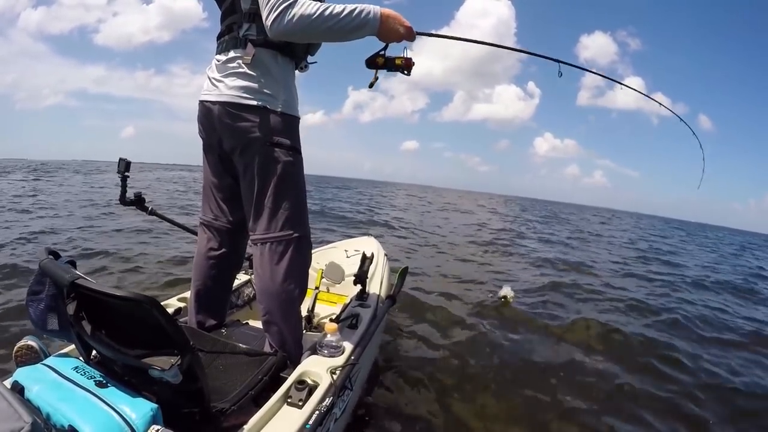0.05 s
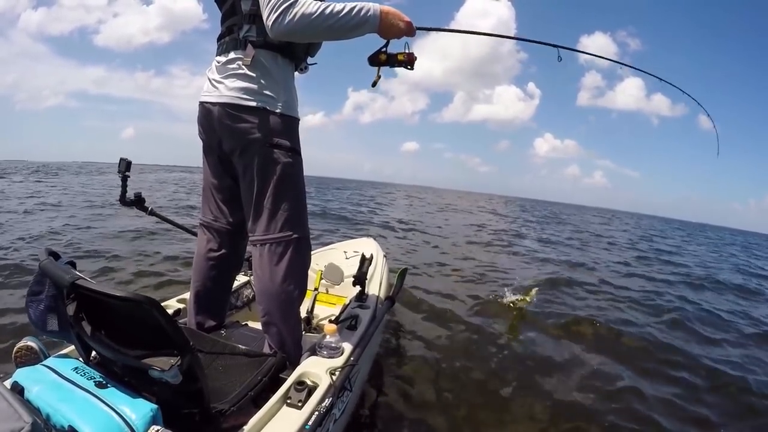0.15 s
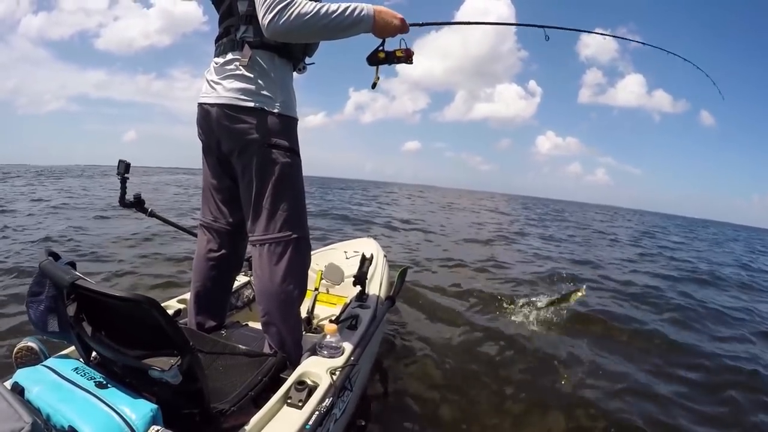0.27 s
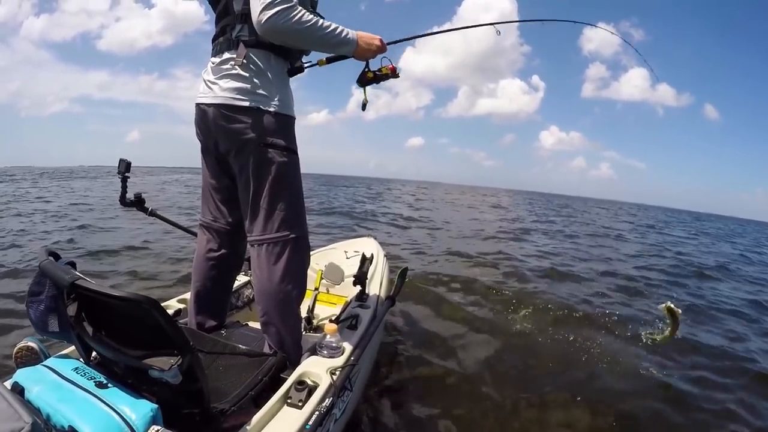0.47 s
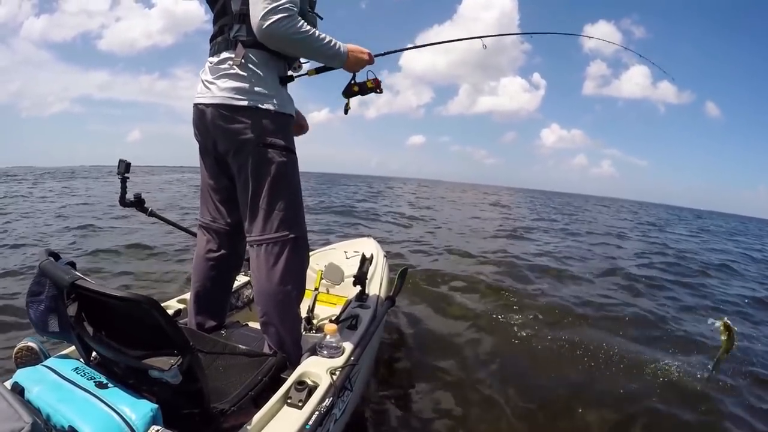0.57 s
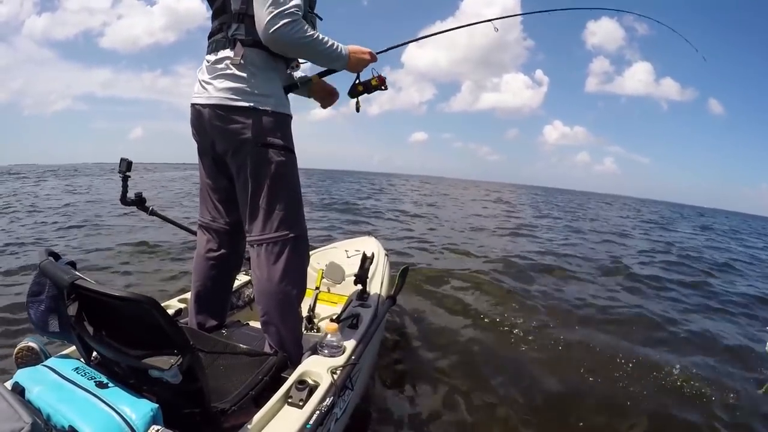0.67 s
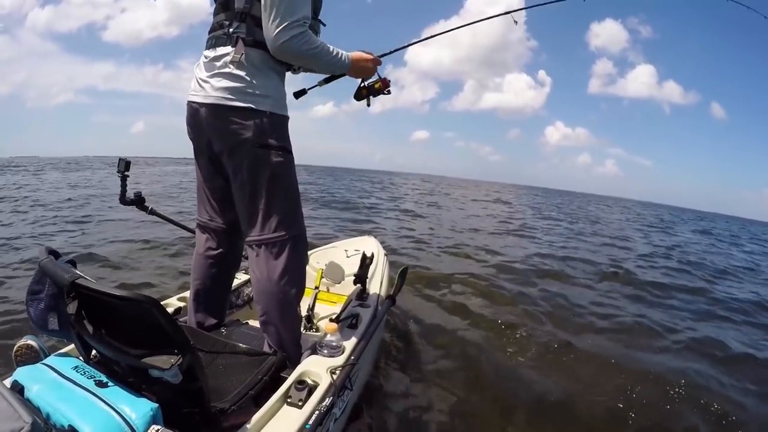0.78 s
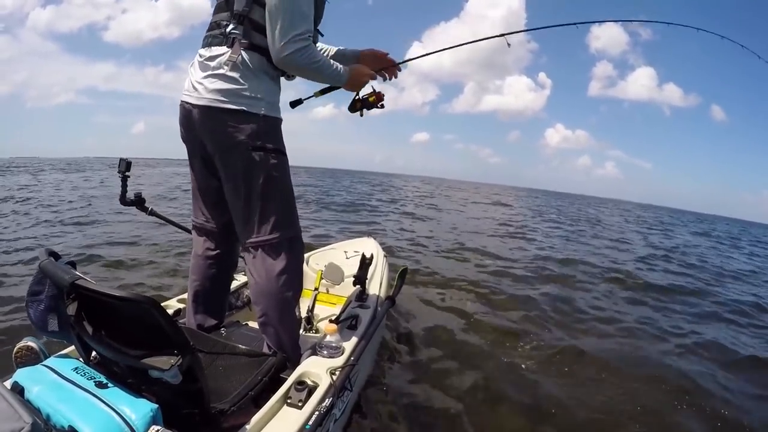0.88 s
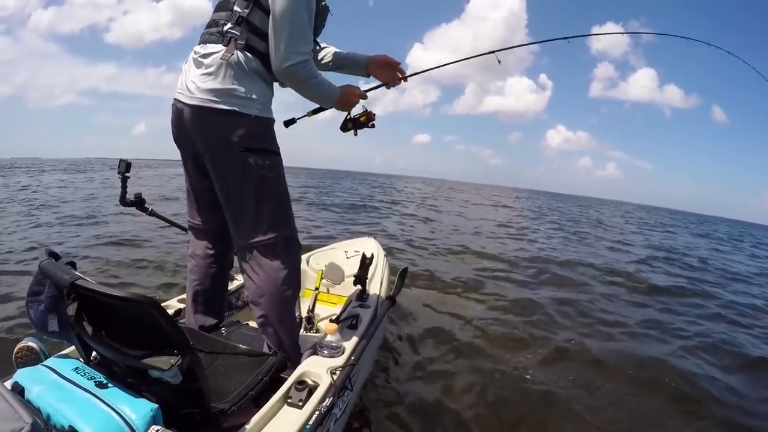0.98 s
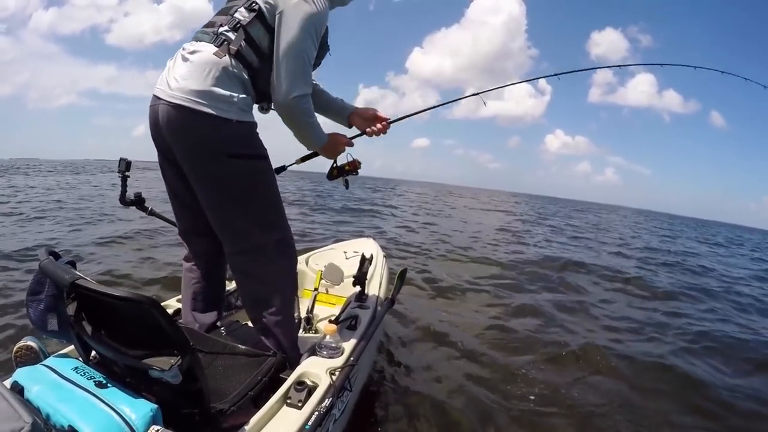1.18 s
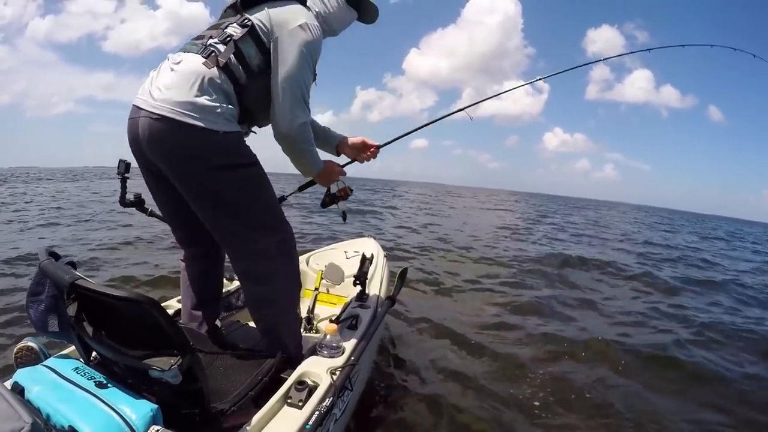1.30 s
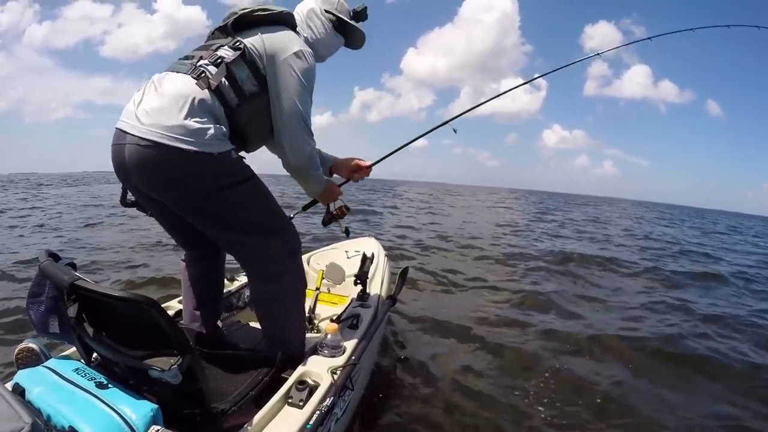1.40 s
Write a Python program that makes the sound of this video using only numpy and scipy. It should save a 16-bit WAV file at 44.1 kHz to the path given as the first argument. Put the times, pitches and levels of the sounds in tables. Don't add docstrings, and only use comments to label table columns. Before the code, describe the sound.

Water slaps a hollow plastic kayak hull, one hard knock, then a second weaker, amid droplets

```python
import sys
import numpy as np
from scipy import signal
from scipy.fft import rfft, irfft
from scipy.io import wavfile
from scipy.ndimage import uniform_filter1d

SR = 44100
rng = np.random.default_rng(int(sys.argv[2]) if len(sys.argv) > 2 else 0)


def field_ratio(decibels):
    return 10 ** (np.asarray(decibels, dtype=float) / 20)


def to_wav(sig):
    pcm = np.clip(np.atleast_2d(sig), -1, 1) * 32767
    pcm = np.round(pcm).astype(np.int16)
    wavfile.write(sys.argv[1], SR, pcm.T)


N = 63945


def unit(x):
    return x / np.sqrt(np.mean(x ** 2) + 1e-20)


def along(points, hz):
    f, level = np.transpose(points)
    return np.interp(np.log(hz + 1), np.log(f + 1), level, left=-120, right=-120)


def bump(hz, focus_hz, width_oct):
    octaves = np.log2((hz + 1) / focus_hz)
    return -6 * (octaves / max(width_oct, 0.05)) ** 2


def noise(gain, size):
    spectrum = rfft(rng.standard_normal(size))
    return unit(irfft(spectrum * gain(np.fft.rfftfreq(size, 1 / SR)), size))


def rings(s, db, hz, t60, rise, turn, size, glide=0):
    t = np.arange(size) / SR
    columns = (s, db, hz, t60, rise, turn)
    s, db, hz, t60, rise, turn = [np.broadcast_to(v, np.shape(s))[:, None] for v in columns]
    envelope = field_ratio(db - 60 * t / t60) * (1 - np.exp(-t / rise)) ** 2
    cycles = hz * t * (1 + glide * t / t60) + turn
    wave = envelope * np.sin(2 * np.pi * cycles)
    at = np.round(np.abs(s) * SR).astype(int) + np.arange(size)
    return np.bincount(at.ravel(), wave.ravel(), N + 2 * SR)[:N]


# (time [s], level [dB], focus [Hz], focus width [octaves], ring length [factor])
SLAPS = [(.026, -39, 1250, 0.36, 0.58), (.036, -38.5, 580, 0.071, 0.67), (.09, -35.5, 1150, 0.38, 0.54),
         (.101, -40.5, 930, 0.58, 0.62), (.136, -41.5, 1510, 0.34, 0.49), (.2145, -22.5, 1250, 0.5, 1.34),
         (.226, -19.5, 926, 0.29, 1.1), (.237, -21, 726, 0.7, 0.39), (.29, -42, 883, 0.32, 2.3),
         (.414, -39, 621, 0.11, 0.55), (.528, -47, 860, .15, 0.4), (.5545, -38.5, 1000, 0.48, 0.5),
         (.574, -38.5, 1230, 0.76, 1.08), (.64, -53.5, 810, 0.51, 1.7), (.84, -41, 1550, 0.5, 0.7),
         (0.855, -45, 1100, 0.69, 1.46), (0.8948, -35, 1100, 0.5, 0.5), (.905, -21, 1430, 0.25, 0.54),
         (.909, -33, 1000, 0.36, 0.4), (1.138, -42, 1610, 0.79, 0.17), (1.28, -54.5, 900, 0.47, 2.5),
         (1.318, -54.5, 840, 0.42, 1.3), (1.372, -52, 900, 0.3, 2), (1.394, -49, 1110, 0.54, 1.6),
         (.075, -43, 600, 0.087, 0.72), (.11, -37.5, 920, 0.55, 0.23), (.251, -21, 690, 0.65, 0.26),
           (.565, -32.5, 1400, 0.21, 0.57), (.586, -44, 770, 0.44, 0.42), (0.711, -38, 1470, 0.24, 0.28),
           (1.41, -43, 1220, 0.4, 1), (.914, -36, 703, 0.35, 0.4), (0.2165, -22, 780, 1, .3),
           (.556, -35.5, 1620, .3, 1), (0.574, -39, 1460, 0.21, .6), (.58, -47, 400, 0.52, 0.39),
           (.852, -46.5, 1250, 0.47, 0.94), (.861, -53, 720, 0.18, 0.3), (.873, -50, 710, 0.15, 0.83),
           (.897, -22.5, 1158, 0.12, 0.87), (.945, -42, 670, 0.19, 0.67), (1.139, -41.5, 1250, 0.53, 0.26),
           (1.31, -49, 710, 0.19, 0.57)]
# (frequency [Hz], level [dB], t60 [s])
HULL_MODES = [(272.2, 6.5, 0.18), (320, -28, 0.093), (413, -18, 0.58), (544, -0.5, 0.052), (601, -4, 0.13),
              (671.2, 1, 0.12), (755.6, 0, 0.036), (809.5, -12.5, 0.18), (900, -9.5, 0.15),
              (1074, -21, 0.11), (1250, -9, 0.091), (1352, -15, 0.028), (1535, -6, 0.021),
              (1800, -33, 0.023)]
# (frequency [Hz], level [dB])
FILL_MODES = [(200, 10), (300, 12), (460, -2), (650, -0.5), (1100, 1.5), (1700, -5.5), (2000, -31)]


def slaps():
    hull_hz, hull_db, hull_t60 = np.transpose(HULL_MODES)
    count, fill_count = len(hull_hz), 40
    scatter_db, rise_cycles = 4, 0.53
    skirt_db = -27.5
    out = np.zeros(N)
    for s, db, focus_hz, width_oct, length in SLAPS:
        fill_hz = 220 * 9 ** rng.random(fill_count)
        scattered_db = hull_db + scatter_db * rng.uniform(-1, 1, count)
        hz = np.append(hull_hz, fill_hz)
        mode_db = np.append(scattered_db, -12 + along(FILL_MODES, fill_hz))
        t60 = np.append(hull_t60, 0.17 * np.sqrt(660 / fill_hz)) * length
        lag = 0.002 * (660 / hz) ** 1.4
        colour_db = np.maximum(bump(hz, focus_hz, width_oct), skirt_db)
        turn = rng.random(len(hz))
        out += rings(s + lag, db + mode_db + colour_db, hz, t60, rise_cycles / hz, turn, size=7000)
    return out


# (frequency [Hz], level [dB], t60 [s])
PANEL_MODES = [(266.1, -22, 0.3), (345, -18, .2), (542.6, 0, 0.11), (590, -8, .13), (661.4, 4.5, 0.13),
               (743, -2, 0.14), (804, -24, 0.15), (904.7, -6.5, 0.12), (1095, -14, .09), (1265, -24, 0.16),
               (1314, -22.5, 0.097), (1507, -11, 0.031), (1719, -15.5, 0.035)]


def blow():
    start_s, blow_db, rise_s = 0.2155, -10, 0.0075
    travel_s = 0.002578
    hz, level_db, t60 = np.transpose(PANEL_MODES)
    start = np.full(len(hz), start_s)
    return rings(start, blow_db + level_db, hz, t60, rise_s * 660 / hz, -hz * travel_s, size=12000)


# (time [s], level [dB], pitch [Hz], t60 [s], pitch glide [fraction])
POCKETS = [(.047, -38.5, 590, .07, -0.12), (.061, -41, 606, 0.096, 0.03), (.0905, -40, 1250, 0.045, 0.066),
           (.2185, -6, 729, 0.021, -0.054), (.2395, -13, 740, .04, 0), (.228, -18, 930, .09, 0),
           (.2325, -20, 1050, 0.031, -0.0016), (.219, -26, 282.4, 0.062, 0.091),
           (.564, -33, 900, 0.073, 0.061), (.9115, -16, 801, .06, -.55), (.9235, -21, 740, .07, -.2),
           (.897, -26, 1200, .07, 0), (.897, -27, 750, .05, 0), (1.138, -34, 1550, .03, -0.091),
           (.575, -35, 1350, 0.016, -.2), (1.374, -42, 850, .1, .3), (1.394, -38, 1000, .06, .2),
           (.71, -42, 1300, .03, 0), (.556, -47, 1747, 0.053, 0.12)]


def pockets():
    s, db, hz, t60, glide = np.transpose(POCKETS)
    rise_s = 0.0015
    return rings(s, db, hz, t60, rise_s, 0, size=4000, glide=glide[:, None])


# (time [s], level [dB], pitch [Hz], t60 [s])
BOOMS = [(0.221, -40, 243.4, 0.33), (0.232, -43.5, 155.8, 0.31), (.47, -42, 115.5, 0.12),
         (.59, -51.5, 286.6, 0.16), (0.256, -40.5, 120.4, 0.34), (0.224, -35, 195.2, 0.18),
         (.28, -40.5, 88.6, 0.24), (0.418, -34, 109.3, 0.12), (0.468, -45, 192, 0.13),
         (0.728, -60, 125.5, 0.45), (0.918, -29, 157.6, 0.088), (0.951, -35, 109.7, 0.12),
         (1.24, -55, 111, 0.23), (1.31, -55, 87, 0.18), (0.042, -67, 122, 0.081), (1.412, -50, 111.6, 0.47),
         (1.43, -38, 256, 0.13)]


def booms():
    s, db, hz, t60 = np.transpose(BOOMS)
    rise_s = 0.015
    return rings(s, db + 7.5, hz, t60, rise_s, 0, size=16000)


# (time [s], peak level [dB], pitch [Hz], splash width [octaves])
DROPS = [(0.076, -50, 2830, 0.21), (.137, -48.5, 2440, 0.15), (0.28, -48.5, 3560, 0.44),
         (0.288, -51.5, 6600, 0.092), (0.301, -41, 3090, 1.56), (0.316, -51, 7480, 0.29),
         (0.345, -54, 4500, 0.66), (.36, -47, 4120, 0.65), (0.413, -46, 2620, 0.29),
         (1.366, -54.5, 10800, 1.1), (0.499, -51.5, 4600, 1), (0.554, -45, 2150, 0.47),
         (0.595, -46, 3110, 0.26), (0.613, -48, 3300, 0.39), (.71, -43, 3627, 0.67),
         (0.826, -54.5, 7640, .3), (.825, -57, 12500, 0.33), (.841, -45.5, 2260, .5),
         (0.893, -44, 2300, 0.18), (1.0193, -37.5, 3200, 0.37), (1.038, -54, 11700, 1.7),
         (1.138, -48, 1810, 0.76), (1.15, -51.5, 4330, 0.37), (1.188, -49.5, 2680, 1.1),
         (1.206, -45, 2290, 0.38), (1.293, -46, 2670, 0.22), (1.294, -50, 5760, .2),
         (1.306, -44.5, 3940, 0.3), (1.305, -45, 2470, 0.19), (1.206, -57, 8300, 0.36),
         (1.013, -52.5, 6820, 0.36), (1.035, -48.5, 2870, 0.58), (1.443, -51, 8250, .3),
         (0.31, -50.5, 4900, 0.82), (.433, -52, 4500, .3), (0.351, -53, 6900, 0.46),
         (.366, -51, 4400, 0.53), (.841, -54, 3000, 0.14), (1.362, -42.5, 3100, 0.96),
         (1.411, -43.5, 3640, 0.92), (1.443, -42.5, 2860, 0.63)]
# (frequency [Hz], level [dB])
PUFF = [(900, -30), (1600, -4), (4000, 0), (9000, -1), (15000, -2)]


def drops():
    t60, rise_s, glide, lumps_db = 0.028, 0.0008, 0.04, 2.5
    s, db, hz, _ = np.transpose(DROPS)
    bubbles = rings(s, db, hz, t60, rise_s, 0, size=2500, glide=glide)
    out = np.append(bubbles, np.zeros(SR))
    t = np.arange(2500) / SR
    for at, level_db, pitch_hz, width_oct in DROPS:
        lumps = lumps_db * unit(uniform_filter1d(rng.standard_normal(len(t) // 2 + 1), size=40))
        puff = noise(lambda f: field_ratio(lumps + along(PUFF, f) + bump(f, pitch_hz, width_oct)), len(t))
        envelope = field_ratio(level_db - 60 * t / t60) * (1 - np.exp(-t / rise_s))
        out[round(at * SR):][:len(t)] += envelope * puff
    return out[:N]


# (time [s], level [dB])
SPRAY = [(0, -62.5), (0.261, -59), (.29, -55), (.37, -56.5), (.4, -61.5), (0.659, -58), (.76, -62),
         (1.0, -59), (1.1, -61), (1.28, -60), (1.45, -57)]


def spray(count=2500):
    when, level_db = np.transpose(SPRAY)
    s = rng.random(count) * N / SR
    hz = np.clip(3300 * np.exp(0.351 * rng.standard_normal(count)), 1700, 14000)
    size_db = 2.2 * np.minimum(rng.exponential(size=count), 4)
    t60 = 3 * 7 / hz
    grains = unit(rings(s, size_db, hz, t60, 1 / hz, 0, size=500))
    mean_db = level_db.mean()
    swell_db = np.interp(np.arange(N) / SR, when, level_db - mean_db)
    return field_ratio(mean_db - 1 + 0.97 * swell_db) * grains


# (frequency [Hz], level [dB per Hz])
FLOOR = [(24, -71.5), (40, -21), (126, -3), (325, -15), (461, -17), (838, -17), (1250, -20.5), (14000, -35),
         (15500, -37)]
# (time [s], level [dB])
WASH = [
    (0, 0.5),
    (.2, -0.5),
    (.35, 1),
    (.6, 1),
    (.78, -2),
    (.95, 2),
    (1.1, -0.6),
    (1.301, 1.6),
    (1.45, 0),
]


def wash():
    z = signal.stft(noise(lambda f: field_ratio(along(FLOOR, f)), N), nperseg=512)[2]
    field = uniform_filter1d(rng.standard_normal(z.shape), size=6, axis=0)
    field = uniform_filter1d(field, size=8, axis=1)
    patchy = unit(signal.istft(z * field_ratio(1.27 * unit(field)), nperseg=512)[1][:N])
    swell_db = np.interp(np.arange(N) / SR, *np.transpose(WASH))
    return field_ratio(-55 + swell_db) * patchy


# (frequency [Hz], width [Hz], level [dB])
WHINE = [(4800, 120, -79), (9600, 150, -77), (10900, 200, -81), (12600, 150, -82), (14380, 180, -77)]


def whine():
    out = np.zeros(N)
    for hz, width_hz, db in WHINE:
        out += field_ratio(db) * noise(lambda f: np.exp(-((f - hz) / width_hz) ** 2), N)
    return out


def scene():
    hull = slaps() + blow() + pockets() + booms()
    water = drops() + spray() + wash()
    return (hull + water + whine())[None]


def band_limit(x):
    return signal.sosfilt(signal.butter(12, 15900, fs=SR, output="sos"), x)


def record(dry):
    low_hz, top_hz = 40, 15250
    hz = np.fft.rfftfreq(2 * N, 1 / SR)
    low_pass = 1 / (1 + (hz / top_hz) ** 60)
    high_pass = 1 / (1 + (low_hz / (hz + 1)) ** 3)
    narrow = irfft(rfft(dry, 2 * N) * low_pass * high_pass)[:, :N]
    return band_limit(narrow)


dry = scene()
out = record(dry)
to_wav(out)
```